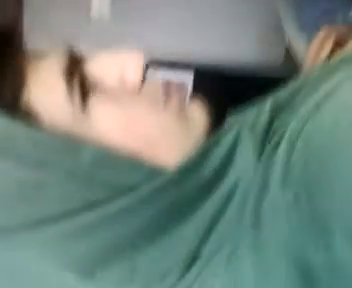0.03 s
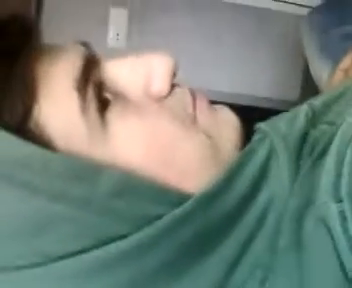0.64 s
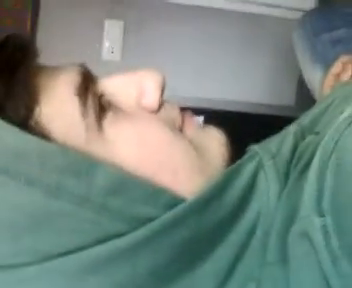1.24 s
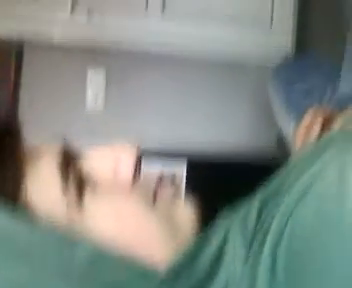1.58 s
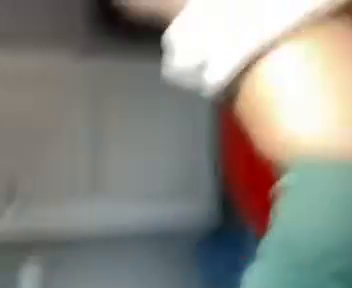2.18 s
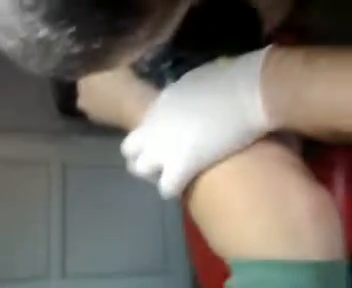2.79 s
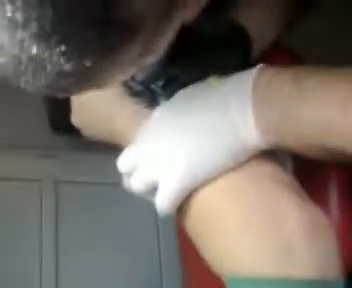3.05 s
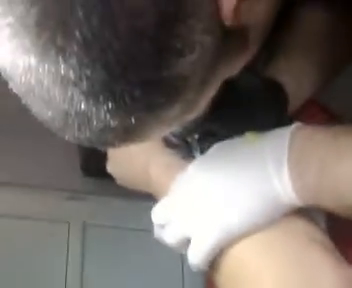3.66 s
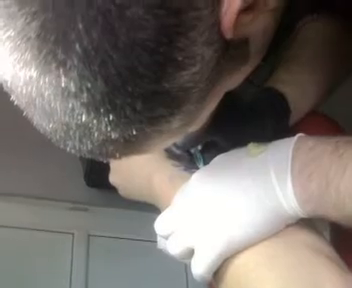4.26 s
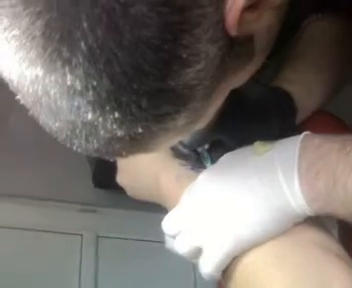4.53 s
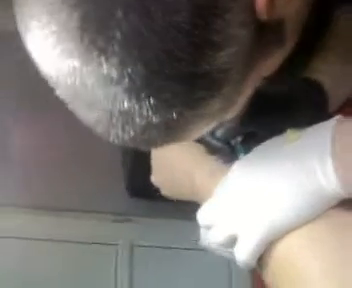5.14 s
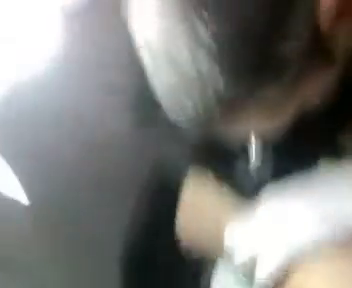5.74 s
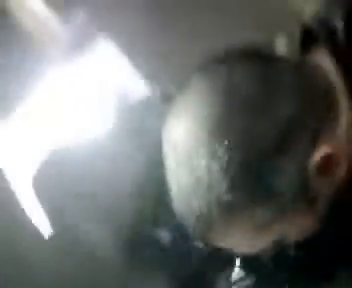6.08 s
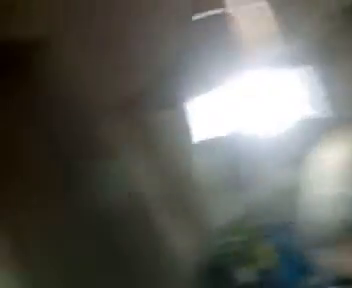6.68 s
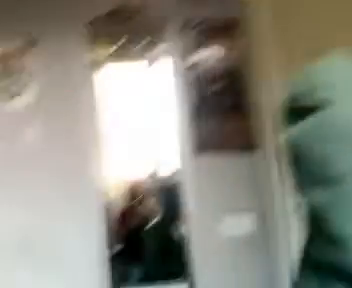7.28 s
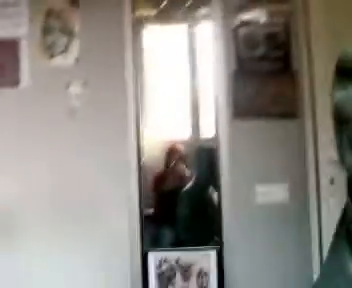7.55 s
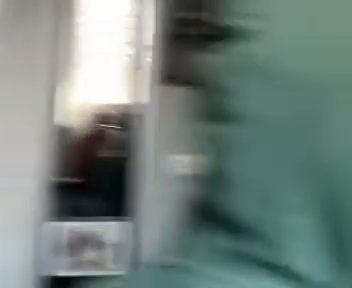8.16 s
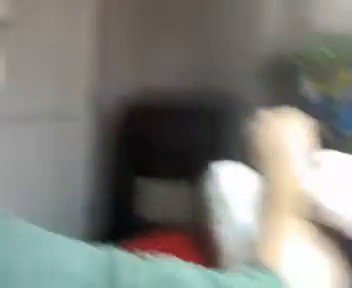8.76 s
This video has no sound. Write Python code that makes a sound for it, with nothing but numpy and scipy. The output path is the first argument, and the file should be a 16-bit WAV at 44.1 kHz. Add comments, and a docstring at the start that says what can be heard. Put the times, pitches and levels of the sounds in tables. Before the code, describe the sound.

Close to a moving hand-held microphone, a tattoo machine runs with a steady, high, raspy buzz and slight chatter in a small echoing room. A very faint low hum comes and goes beneath it. After about seven seconds the machine is switched off, with a swell of cloth rustle and rumble. A quick cluster of sharp finger clicks and soft thumps follows, leaving quiet room air.

```python
"""First comes the buzz of a coil tattoo machine in a bare room, as a hand-held camera moves around it.
Its armature, a small iron bar, slaps the coils 120 times a second and chatters when the needle drags
in the skin. The machine is switched off, the room rings out, and fingers click and bump on the camera.
Underneath are room air, a low rumble, brushing cloth and a faint hum that comes every two seconds."""
import sys
import numpy as np
from scipy import signal
from scipy.fft import rfft, irfft
from scipy.io import wavfile
from scipy.ndimage import uniform_filter1d

SR = 44100
rng = np.random.default_rng(int(sys.argv[2]) if len(sys.argv) > 2 else 0)


def transcribe(u):
    """Save the signal u as a 16-bit wav file named by the first command-line argument.

    u: samples, shape (n,) or (channels, n), limited to [-1, 1]; the rate is SR.
    q: integer samples, one column per channel.
    """
    v = np.clip(np.atleast_2d(u).T, -1, 1)
    q = np.round(v * 32767).astype(np.int16)
    wavfile.write(sys.argv[1], SR, q)


N = 388962
TIME = np.arange(N) / SR
OFF_S = 7.454  # the power is cut

# the camera's path through the room's pattern of loud and quiet spots: t/s, distance/turns
CAMERA_PATH = [(0, 0), (1.4, .5), (2.9, 1.5), (3.8, 2), (5.4, 2.0), (7.5, 4.0)]


def amp(db):
    """Turns decibels into a gain."""
    return 10 ** (np.asarray(db) / 20)


def unit_rms(x):
    """Scales a signal to an average power of 1."""
    return x / np.sqrt(np.mean(x ** 2) + 1e-20)


def curve(rows, t=TIME, column=1):
    """Reads one column of a table at the times t."""
    rows = np.asarray(rows)
    return np.interp(t, rows[:, 0], rows[:, column])


def spectrum(points, hz):
    """Reads (frequency, value) points on a log-frequency axis."""
    f, value = np.transpose(points)
    return np.interp(np.log(hz + 1), np.log(f + 1), value)


def wander(t, max_rate, count=12):
    """A smooth random drift, about 1 in size."""
    speed, phase = rng.random((2, count, 1))
    return np.sqrt(2 / count) * np.sin(2 * np.pi * (max_rate * speed * t + phase)).sum(0)


def noise(colour):
    """Steady noise of power 1 with the given tone colour."""
    gain = amp(spectrum(colour, np.fft.rfftfreq(N, 1 / SR)))
    return unit_rms(irfft(rfft(rng.standard_normal(N)) * gain, N))


def ring(x, colour, size=4096):
    """Gives a sound a tone colour that rings only after each click, never before."""
    log_gain = np.log(amp(spectrum(colour, abs(np.fft.fftfreq(size, 1 / SR)))))
    response = np.fft.ifft(np.exp(np.conj(signal.hilbert(log_gain)))).real
    return signal.oaconvolve(x, response[:size // 2])[:N]


def clicks(times, heights, size=8):
    """Sharp clicks at exact times, even between two samples."""
    at = np.floor(times * SR).astype(int)[:, None] + np.arange(1 - size, size + 1)
    away = at - times[:, None] * SR
    shape = np.sinc(away) * np.cos(np.pi * away / size / 2) ** 2 * heights[:, None]
    inside = (at >= 0) & (at < N)
    return np.bincount(at[inside], shape[inside], N)


def tattoo_machine():
    """The same strokes ring the bright armature, the spring and the duller frame."""
    # strokes a second, as heard at the moving camera: t/s, f/Hz
    stroke_rate = [(0.05, 120.1), (1.05, 119.6), (1.77, 120), (2.3, 120.3), (2.84, 120.15), (3.39, 119.65),
                   (4.47, 119.7), (5.59, 120.2), (7.32, 120.25), (7.42, 119.5)]
    # the tone colour of each part: f/Hz, gain/dB
    armature_colour = [(3700, -43.5), (4400, -18.5), (4750, -6), (5250, -0.5), (5650, -4.5), (5950, -8),
                       (6450, -9), (6750, -11.5), (7300, -14.5), (9000, -11.5), (11000, -58.5)]
    spring_colour = [(2200, -37), (2620, -8), (2950, -4), (3250, -6.5), (3700, -0.5), (4100, 1.5),
                     (4400, 4), (5000, -23.5)]
    frame_colour = [(1100, -47.5), (1500, -25), (1680, -7), (1820, -2), (2060, 2), (2400, -1.5), (2540, -4),
                    (2900, -43.5)]
    cycles = np.cumsum(curve(stroke_rate)) / SR
    slaps = chirp(strokes(cycles))
    clack = at_level(ring(slaps, armature_colour), part_db(1, sway_db=0.5, db_per_us=-0.0046) + 0.36)
    spring = at_level(ring(slaps, spring_colour), part_db(2, sway_db=0.5, db_per_us=0.0429) + 0.5)
    frame = at_level(ring(slaps, frame_colour), part_db(3, sway_db=0.84, db_per_us=0.0424) - 0.24)
    return clack + spring + frame + armature_hum(cycles) + last_taps()


def strokes(cycles, free_spread_us=7.8, memory=0.48, db_per_us=0.0441, rebound_db=-11, rebound_s=0.0039):
    """One slap a cycle and a lighter rebound on the contact screw, heard directly and through the room."""
    # how openly the machine faces the camera: t/s, direct gain/dB
    facing = [(0.28, 1.5), (.6, -1.5), (1.5, -2), (1.98, 2.5), (2.35, -2), (2.85, -4.5), (3.05, -8.5),
              (4.4, -8.5), (5.1, -5.5), (6.65, -7.5), (7.25, -2.5), (7.35, -12)]
    # the armature beams its main ring straight ahead: f/Hz, direct gain/dB
    beam = [(1500, 0.5), (2100, 4), (3000, 0.5), (4200, -3), (5000, 4.5), (5650, 6), (6300, -10),
            (7500, -6.5)]
    # first echoes, shifting as the camera moves: delay/ms, relative level/dB, drift/ms
    echoes = [(1.1, -4.5, 0.305), (2.4, -3.5, 0.4843), (4.3, -14.5, 0.614), (6.1, -7.5, 0.696),
              (10.2, -7, 0.888), (13.4, -9.5, 1.095)]
    beat = np.interp(np.arange(0.15, np.interp(OFF_S, TIME, cycles)), cycles, TIME)
    spread_us = free_spread_us + needle_drag(beat)
    # a stroke that lands late also lands softly, and upsets the next few
    slip, bounce = signal.lfilter([1], [1, -memory], rng.standard_normal((2, len(beat))))
    slip_us = unit_rms(slip) * spread_us
    bounce_us = 2 * unit_rms(bounce) * spread_us
    slap_times = beat + slip_us / 1e6
    times = np.r_[slap_times, slap_times + rebound_s + bounce_us / 1e6]
    force = np.r_[amp(-db_per_us * slip_us), amp(rebound_db + db_per_us * bounce_us)]
    direct = ring(clicks(times, force * amp(curve(facing, times))), beam)
    early = np.zeros(N)
    for ms, db, drift_ms in echoes:
        delay_ms = ms + drift_ms * wander(curve(CAMERA_PATH, times), max_rate=0.6)
        early += clicks(times + delay_ms / 1e3, force * amp(db))
    return direct + amp(-2) * early + room(clicks(times, force))


def chirp(x, low_hz=4300, high_hz=5900, lag_s=0.0012):
    """The upper ring of each slap builds later than the lower, making a short upward chirp."""
    late_s = np.interp(np.fft.rfftfreq(N, 1 / SR), [low_hz, high_hz], [0, lag_s])
    return irfft(rfft(x) * np.exp(-2j * np.pi * np.cumsum(late_s) * SR / N), N)


def part_db(column, sway_db, db_per_us):
    """A part's level follows the camera, the sway of the hand and the drag on the needle."""
    # relative levels as the camera moves: t/s, armature/dB, spring/dB, frame/dB
    levels = [(0.03, -25, -39, -36.5), (0.11, -25, -36.5, -36.5), (0.48, -26, -38, -39.5),
              (0.67, -26.5, -35.5, -38.5), (1.29, -25.5, -36, -41.5), (1.52, -28, -38, -39),
              (1.85, -25.5, -38, -41.5), (1.89, -26, -38, -38), (2.2, -26, -38.5, -40),
              (3.27, -28.5, -37.5, -42), (4.86, -26, -38, -41), (4.99, -29.5, -38, -42.5),
              (5.61, -26.5, -37, -44), (5.92, -27.5, -35.5, -43.5), (6.87, -27, -41, -41.5),
              (7.16, -27, -35, -40), (7.33, -27, -37, -37), (7.45, -27, -41, -41.5)]
    coarse = TIME[::256]
    sway = sway_db * wander(coarse, max_rate=6)
    db = curve(levels, coarse, column) + sway + db_per_us * needle_drag(coarse)
    return np.interp(np.minimum(TIME, OFF_S), coarse, db)


def at_level(x, db, size=3675):
    """Sets the slow level of a running part; the last gain holds while the room rings out."""
    power = uniform_filter1d(uniform_filter1d(x ** 2, size), size // 2)
    last = round(OFF_S * SR) - size // 2
    power[last:] = power[last]
    return x * amp(db) / np.sqrt(abs(power) + 1e-20)


def room(x, spots=5):
    """Each spot in the room has its own echo; the camera passes from one to the next."""
    out, coarse = np.zeros(N), TIME[::512]
    for k in range(spots):
        nearness = np.maximum(np.cos(2 * np.pi * (curve(CAMERA_PATH, coarse) / 2 - k / spots)), 0)
        out += np.interp(TIME, coarse, nearness) * signal.fftconvolve(x, room_tail())[:N]
    return out / np.sqrt(spots / 4)


def room_tail(build_s=0.012):
    """Many echoes blur into one fading wash; the treble dies first."""
    # how long the room rings: f/Hz, time to fade by 60 dB/s
    ring_times = [(500, .8), (2600, 0.79), (5200, 0.6), (8000, 0.59)]
    hz, t, bands = signal.stft(rng.standard_normal(SR // 2), SR, nperseg=256)
    bands = bands * amp(-60 * t / spectrum(ring_times, hz)[:, None])
    echo = signal.istft(bands * (1 - np.exp(-t / build_s)), SR)[1]
    return echo / np.linalg.norm(echo)


def armature_hum(cycles, waver_db=2.1, round_trip_turns=4.2, fade_s=0.12):
    """The swinging bar sends out clean low tones; the room favours different ones near and far."""
    # the tones: multiple of the stroke rate, far level/dB, close level/dB
    tones = [(1, -76, -65.5), (4, -87, -73.5), (5, -70, -72), (6, -65.5, -63), (7, -59.5, -71.5),
             (8, -64, -66.5), (9, -65.5, -73), (10, -65, -53.5), (11, -62.5, -66), (12, -70, -60),
             (13, -65, -62), (14, -65, -58)]
    out, coarse = np.zeros(N), TIME[::512]
    travel = curve(CAMERA_PATH, coarse)
    closeness = np.sin(np.pi * travel / round_trip_turns) ** 2  # up to the machine and away again
    for multiple, far_db, close_db in tones:
        db = far_db + (close_db - far_db) * closeness + waver_db * wander(travel, max_rate=1.1)
        tone = np.sqrt(2) * np.sin(2 * np.pi * (multiple * cycles + rng.random()))
        out += np.interp(TIME, coarse, amp(db)) * tone
    return out * np.exp(-np.maximum(TIME - OFF_S, 0) / fade_s)


def room_air(db=-57.5):
    """The air of the room makes a soft, steady hiss."""
    # its tone colour: f/Hz, relative level/dB
    air_colour = [(60, -4), (125, -6.5), (200, -6.5), (300, -13), (550, -14), (1100, -10.5), (1900, -15),
                  (3000, -22), (4000, -17), (5100, -12), (6200, -23), (7400, -25), (10000, -43)]
    return amp(db) * noise(air_colour)


def handling(still_rumble_db=-61, still_rustle_db=-69, flutter_db=3):
    """A low rumble and an uneven brush of cloth swell whenever the camera shifts in the hand."""
    # the shifts: start/s, length/s, rumble/dB, rustle/dB
    shifts = [(1.85, 0.5, -57, -71), (4.6, 0.95, -55, -78), (5.955, 0.53, -51.5, -76),
              (7.096, 0.68, -47, -53.5), (7.649, 0.63, -52.5, -73), (8.248, 0.66, -62, -64.5)]
    # tone colours: f/Hz, relative level/dB
    rumble_colour = [(15, -26.5), (25, -8.5), (40, -15.5), (49, 5.5), (54, -4), (60, -17), (80, -20.5),
                     (125, -20.5), (170, -26), (260, -35), (500, -48)]
    rustle_colour = [(200, -22.5), (600, -4), (850, -5.5), (1200, -1), (1600, -1.5), (2200, -10),
                     (4000, -25), (9000, -46.5)]
    coarse = TIME[::256]
    rumble_gain, rustle_gain = amp(still_rumble_db), amp(still_rustle_db)
    for start, length, rumble_db, rustle_db in shifts:
        swell = np.sin(np.pi * np.clip((coarse - start) / length, 0, 1))
        rumble_gain = np.hypot(rumble_gain, amp(rumble_db) * swell)
        rustle_gain = np.hypot(rustle_gain, amp(rustle_db) * swell)
    rustle_gain *= amp(flutter_db * wander(coarse, max_rate=25))
    rumble = np.interp(TIME, coarse, rumble_gain) * noise(rumble_colour)
    rustle = np.interp(TIME, coarse, rustle_gain) * noise(rustle_colour)
    return rumble + rustle


def finger_touches(scrape=0.7, scrape_s=0.0014, size=6000):
    """Each touch is a blow with a tiny scrape that rings the camera body, too close for any echo."""
    # the body's tones: f/Hz, gain/dB, time to fade by 60 dB/s, kind (0 thud, 1 knock, 2 snap)
    body_tones = [(54, -1.5, 0.11, 0), (183, -1, 0.013, 0), (480, -11, 0.01, 1), (1030, -7.5, 0.011, 1),
                  (1400, -1.5, 0.01, 1), (2200, -6.5, 0.0039, 1), (2980, 1, 0.0071, 1),
                  (3760, 2, 0.0035, 1), (5020, -1, 0.0063, 2), (5360, -3, 0.0051, 2),
                  (5850, -20, 0.0032, 2), (7000, -15, 0.0027, 2)]
    # the touches: t/s, thud/dB, knock/dB, snap/dB
    touches = [(0.279, -62, -43, -59), (3.469, -55, -33, -55), (7.21, -53, -37, -62),
               (7.649, -33.5, -48.5, -67), (7.829, -48, -31, -36.5), (7.833, -33, -36, -40),
               (7.865, -60, -47, -44), (7.872, -37, -54, -43), (7.9183, -70, -68, -41),
               (8.047, -62, -66, -35), (8.125, -70, -60, -40), (8.143, -51, -35, -31.5),
               (8.193, -70, -62, -43), (8.222, -70, -65, -44), (8.294, -72, -66, -43)]
    t, out = np.arange(size) / SR, np.zeros(N + 2 * size)
    tones = [(amp(db - 60 * t / fade_s) * np.sin(2 * np.pi * hz * t), kind)
             for hz, db, fade_s, kind in body_tones]
    for start, *kind_db in touches:
        body = sum(amp(kind_db[kind]) * tone for tone, kind in tones)
        blow = rng.standard_normal(size) * np.exp(-t / scrape_s)
        blow *= scrape / np.linalg.norm(blow)
        blow[0] += 1  # the hit itself
        out[round(start * SR):][:size] += signal.fftconvolve(blow, body)[:size]
    return out[:N]


def needle_drag(t, bite_s=0.021, lift_s=0.06):
    """Skin makes the strokes uneven by some microseconds (us) as the needle bites, holds and lifts."""
    # passes through the skin: start/s, length/s, added timing spread/us
    passes = [(.36, .19, 3.8), (.64, 0.088, 6.7), (.82, 0.32, 13), (1.286, 0.53, 8.2), (1.826, 0.16, 23),
              (2.166, .1, 12), (2.49, 0.15, 14.4), (2.714, .12, 16), (3.17, 0.2, 13), (3.6, 0.13, 5),
              (3.837, 0.26, 19), (4.26, .13, 6), (4.98, 0.28, 8.7), (5.4, 0.15, 14), (6.11, .18, 15),
              (6.396, 0.49, 8.3), (6.908, .22, 9), (7.253, .25, 16)]
    return sum(us * np.clip(np.minimum((t - start) / bite_s, (start + length - t) / lift_s), 0, 1)
               for start, length, us in passes)


def faint_purrs(hz=196, sag_hz=5):
    """A faint hum every two seconds, perhaps a phone vibrating on something soft."""
    # the hums: start/s, length/s, level/dB
    purrs = [(1.2, 0.3, -61), (3.198, 0.44, -62), (5.186, 0.44, -60), (7.194, 0.26, -58.5)]
    out = np.zeros(N)
    for start, length, db in purrs:
        progress = np.clip((TIME - start) / length, 0, 1)
        swell = np.sqrt(2 * abs(np.sin(np.pi * progress)))
        out += amp(db) * swell * np.sin(2 * np.pi * np.cumsum(hz - sag_hz * progress) / SR)
    return out


def last_taps(direct_db=-16, room_db=-6, first_s=0.01, gap_s=0.013, fade_db_per_s=50, count=6):
    """After the power is cut the spring gives a few slower, fading taps, mostly heard through the room."""
    # their tone colour: f/Hz, gain/dB
    tap_colour = [(1500, -38), (2500, -7), (3400, 7), (3700, 8), (4100, 3), (5300, 8), (6200, 3),
                  (7300, -4), (10000, -20)]
    after_s = first_s + gap_s * (np.arange(count) + 0.0795 * rng.standard_normal(count))
    taps = clicks(OFF_S + after_s, amp(-fade_db_per_s * after_s))
    echo = signal.fftconvolve(taps, room_tail())[:N]
    return ring(amp(direct_db) * taps + amp(room_db) * echo, tap_colour)


def scene():
    """All the sounds add up in one channel."""
    return (tattoo_machine() + finger_touches() + faint_purrs() + room_air() + handling())[None]


def record(dry):
    """The high treble is cut away, and the signal rests a little off zero."""
    # a steep treble cut, with a faint band left just above it: f/Hz, gain/dB
    treble_cut = [(7200, 0), (7550, -6), (7950, -40), (8450, -25), (8900, -26)]
    edge_hz, offset = 8900, 0.0771
    low_pass = signal.firwin(511, edge_hz, window=("kaiser", 9), fs=SR)
    return offset + signal.oaconvolve(ring(dry[0], treble_cut), low_pass, "same")[None]


dry = scene()
out = record(dry)
transcribe(out)
```